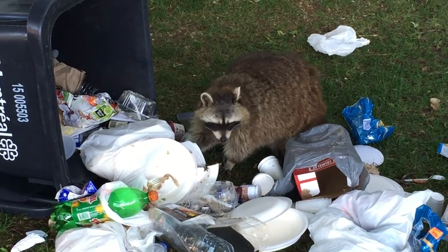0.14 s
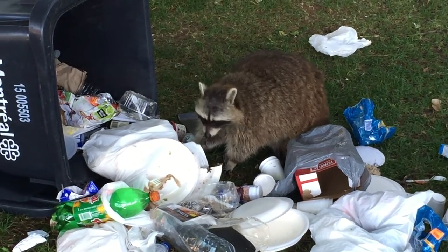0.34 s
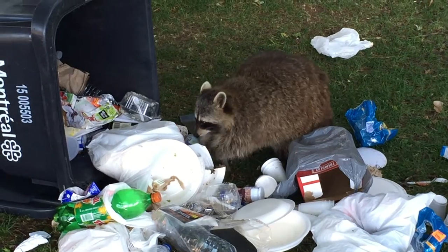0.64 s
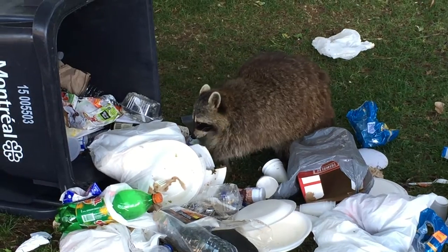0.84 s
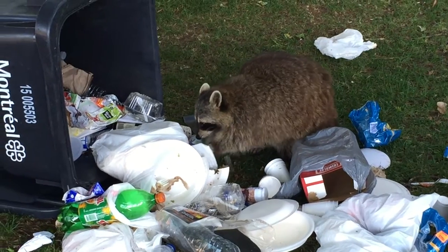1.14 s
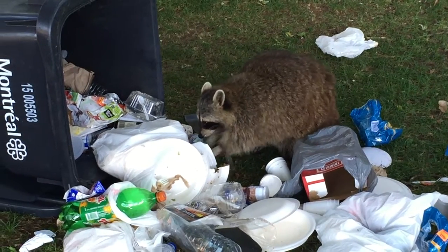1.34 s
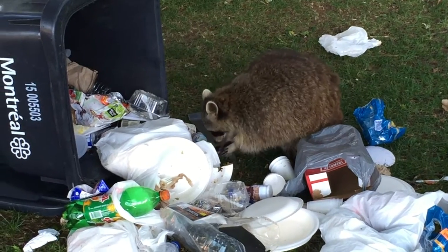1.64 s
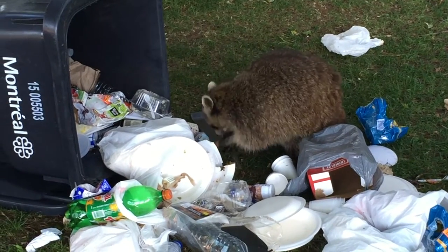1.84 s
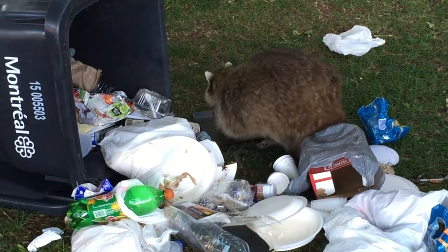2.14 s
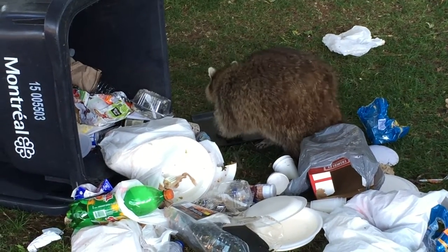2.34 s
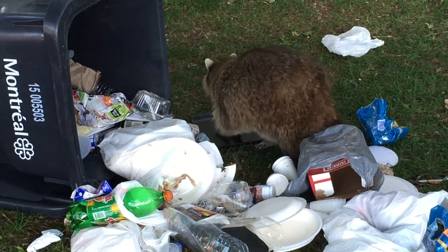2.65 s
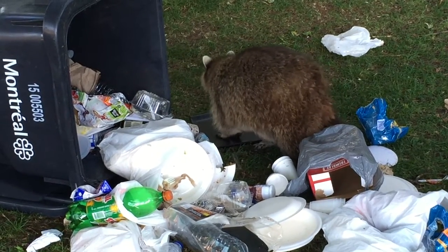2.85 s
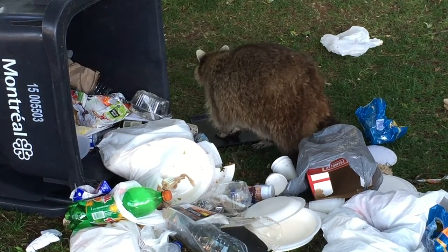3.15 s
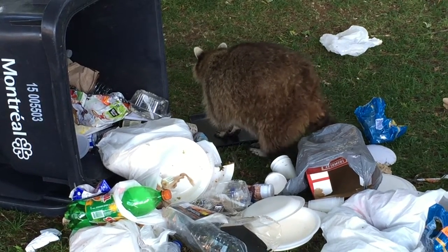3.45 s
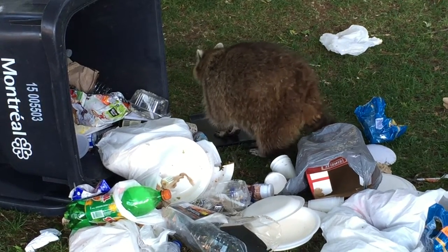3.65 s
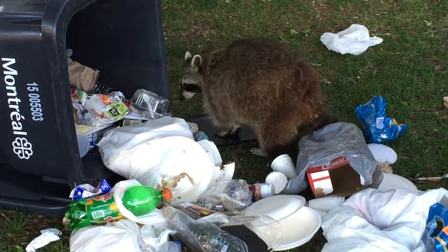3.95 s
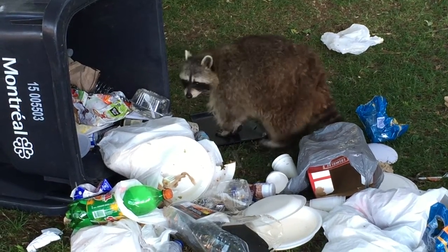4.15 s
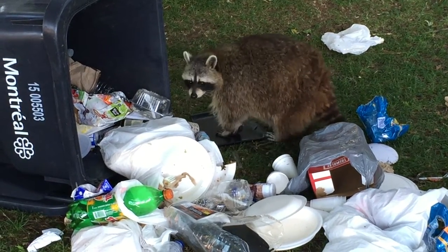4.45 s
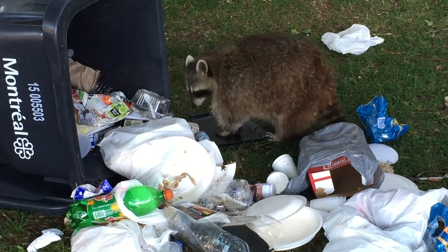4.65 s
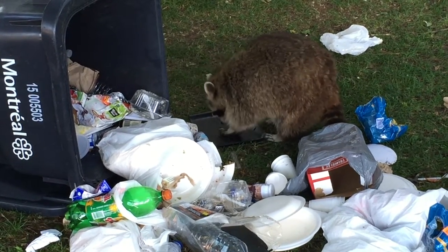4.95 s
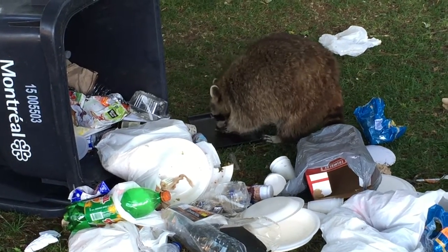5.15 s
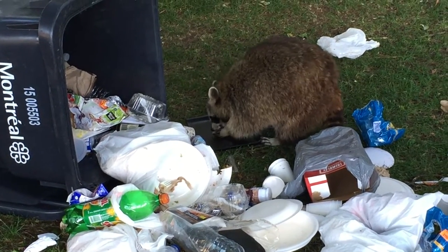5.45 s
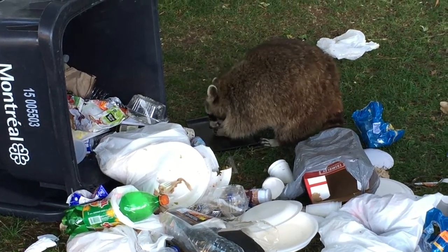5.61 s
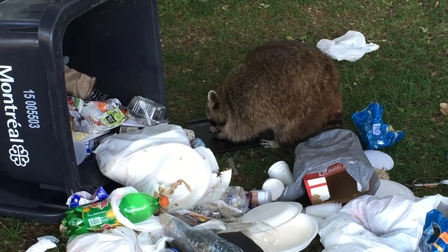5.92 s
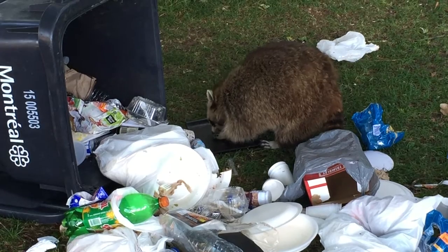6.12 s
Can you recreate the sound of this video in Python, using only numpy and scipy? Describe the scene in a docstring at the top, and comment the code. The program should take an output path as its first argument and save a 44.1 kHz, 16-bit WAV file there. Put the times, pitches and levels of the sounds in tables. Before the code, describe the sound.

Low, soft traffic rumble and airy hush lie under sparse litter sounds. Plastic film rubs dully, a cup ticks, and a hollow thin container knocks several times in rapid succession a third of the way in. After a pause, a bright short crinkle sounds, followed by a sharp bird chip and fading repeats, then distant whistles. Mono, open lawn, litter a little way off, with faint reflections.

```python
"""Raccoon in spilled rubbish

A raccoon noses through rubbish spilled from a bin onto a park lawn. Thin plastic containers knock and
tick as damped modes; bags crinkle and swish as coloured grains of friction. One small bird gives high
falling chips, another whistles further off and stray notes echo, all as gliding tones. Beneath lie
shaped noise for the town's low rumble, far tyres and air, and a faint mains hum from a wavering sine."""
import sys
import numpy as np
from scipy import signal
from scipy.fft import rfft, irfft, next_fast_len
from scipy.io import wavfile
from scipy.ndimage import uniform_filter1d

SR = 44100
rng = np.random.default_rng(int(sys.argv[2]) if len(sys.argv) > 2 else 0)


def dump_mix(stems):
    """Bounce the given channels to the path in sys.argv[1] as a 16-bit WAV at rate SR."""
    frames = np.atleast_2d(stems).T  # one column per channel
    limited = np.clip(frames, -1, 1)  # hard clip at full scale
    pcm = np.round(limited * 32767).astype(np.int16)
    wavfile.write(sys.argv[1], SR, pcm)


N = 276903


def undb(db):
    """Decibels to gain."""
    return 10 ** (np.asarray(db) / 20)


def unit(x):
    """Scale to rms 1."""
    return x / np.sqrt(np.mean(x ** 2))


def seconds(length):
    """Time axis of a short sound."""
    return np.arange(int(length * SR)) / SR


def add(out, start, x):
    """Mix x into out from the given time on."""
    i = max(int(start * SR), 0)
    out[i:i + len(x)] += x[:max(len(out) - i, 0)]


def flat_noise():
    """White noise at 0 dB per Hz."""
    return rng.standard_normal(N) * np.sqrt(SR / 2)


def colour(x, points, tilt_db=0):
    """Filter by an (f/Hz, level/dB) outline, tilted by some dB an octave from its first point."""
    hz, db = np.transpose(points)
    size = next_fast_len(len(x))
    octave = np.log2(np.maximum(np.fft.rfftfreq(size, 1 / SR), 1))
    tilted_db = db + tilt_db * np.log2(hz / hz[0])
    gain = undb(np.interp(octave, np.log2(hz), tilted_db))
    return irfft(rfft(x, size) * gain, size)[:len(x)]


def walk(rate):
    """Slow chance: random levels, rate per second, joined smoothly and scaled to rms 1."""
    k = max(int(SR / rate), 1)
    steps = np.repeat(rng.standard_normal(N // k + 1), k)
    return unit(uniform_filter1d(steps, k)[:N])


def scatter(x, t60, delay):
    """Diffuse echoes that build up after a delay and die away, at the energy of the source."""
    t = seconds(1)
    decay = np.exp(-np.log(1000) * t / t60)
    build_up = 1 - np.exp(-(t / delay) ** 2)
    tail = rng.standard_normal(len(t)) * decay * build_up
    return signal.fftconvolve(x, tail / np.linalg.norm(tail))[:N]


def ring(hz, t60, t):
    """One mode: a sine that loses 60 dB in t60 seconds."""
    return np.sin(2 * np.pi * hz * t) * np.exp(-np.log(1000) * t / t60)


def road(count=8, low_hz=400, high_hz=2000, gust_db=0.5, patchy_db=3.5):
    """Tyre noise carried by the breeze: it swells as a whole, and each narrow band fades by itself."""
    # spectral shape of tyres on a far road: f/Hz, relative density/dB
    tyre_shape = [(250, -118), (470, -105), (620, -92.5), (850, -99.5), (1150, -107), (1900, -115),
                  (2800, -130)]
    size = next_fast_len(N)
    spectrum = rfft(colour(flat_noise(), tyre_shape), size)
    edges = np.geomspace(low_hz, high_hz, count)
    band = np.searchsorted(edges, np.fft.rfftfreq(size, 1 / SR))
    patches = np.zeros(N)
    for k in range(count + 1):
        strip = irfft(spectrum * (band == k), size)[:N]
        patches += strip * undb(patchy_db * walk(14))
    return patches * undb(gust_db * walk(13))


def town(sway_db=0.67, waver_db=3, drone_db=2.46, breeze_db=0.83):
    """Engine rumble whose upper drone swells by itself, far tyres, a wash of air and a wavering hum."""
    # distant traffic, before its drift: f/Hz, density/dB per Hz
    rumble_outline = [(22, -101), (34, -98), (47, -72), (58, -69), (100, -66.5), (135, -68), (160, -75.5),
                      (186, -75), (250, -82.5), (315, -90.5), (400, -99), (900, -130)]
    # wash of leaves and air, before its drift: f/Hz, density/dB per Hz
    air_outline = [(250, -108), (480, -101), (1000, -103.3), (1600, -106.6), (2400, -110.3), (4400, -114.3),
                   (4900, -118.5), (5500, -116.5), (7600, -120.5), (9000, -120.5), (10400, -128),
                   (11700, -124), (15500, -127.5)]
    # tyre noise comes and goes with the far cars: t/s, level/dB
    tyre_swell = [(0, -75), (2.1, -74), (2.7, -71), (3.2, -73), (4.3, -73), (5, -70), (6.28, -74.5)]
    leave_s, fade_db_per_s = 4.46, 1.8  # engines hold, then draw away
    hum_hz, hum_db = 119.2, -58.5  # centre pitch and centre level
    t = np.arange(N) / SR

    engines = colour(flat_noise(), rumble_outline)
    drone = colour(engines, [(150, -40), (220, 0)])
    fade_db = -fade_db_per_s * np.maximum(t - leave_s, 0)
    low_rumble = (engines - drone) * undb(fade_db + sway_db * walk(13))  # the drone does not draw away
    rumble = low_rumble + drone * undb(drone_db * walk(6))
    tyres = unit(road()) * undb(np.interp(t, *np.transpose(tyre_swell)))
    air = colour(flat_noise(), air_outline) * undb(breeze_db * walk(4.5))
    hum = np.sqrt(2) * np.sin(2 * np.pi * hum_hz * t + 0.29 * walk(3))
    return rumble + tyres + air + hum * undb(hum_db + waver_db * walk(2.12))


def rub(friction, centre, half, db, tilt_db, hollow, shoulder=3.1):
    """One swell of friction, coloured by the film and its sinking squeak: its start time and sound."""
    # colour of film rubbed over a hollow, at full hollowness and no tilt: f/Hz, level/dB
    film = [(600, -13), (1700, -1), (4200, 0), (6000, -1), (6900, -8), (7700, -3), (8400, 1), (9200, -2),
            (10400, -10), (11800, 2), (13200, -9), (14300, -2), (14950, 7), (15800, -5)]
    # the sharpest resonance sinks as the film slackens: sag is the share of pitch lost per half length
    squeak_hz, squeak_width_hz, squeak_sag = 8300, 330, .035
    squeak_db = -6  # against the film, with full hollowness and no downward tilt

    start = max(centre - 3 * half, 0)
    grains = friction[int(start * SR):int((2 * centre - start) * SR)]
    u = (start + np.arange(len(grains)) / SR - centre) / half  # time from the centre in half lengths
    pressure = np.exp(-np.abs(u) ** shoulder / 2)
    outline = np.multiply(film, [1, hollow])  # film lying flat has shallower resonances
    rustle = unit(colour(grains, outline, tilt_db))

    # a moving resonance: shift down to 0 Hz, smooth with one pole, shift back up
    turn = np.exp(2j * np.pi * np.cumsum(squeak_hz * (1 - squeak_sag * u)) / SR)
    pole = np.exp(-np.pi * squeak_width_hz / SR)
    squeak = unit(np.real(turn * signal.lfilter([1], [1, -pole], grains / turn)))
    squeak *= undb(squeak_db + 2 * min(tilt_db, 0)) * hollow ** 2  # dull rubs hardly excite it
    return start, undb(db) * pressure * (rustle + squeak)


def bags(crease_rate=3500, crease_spread_db=2.0, hiss=0.88):
    """Sliding film lets go in tiny creases that swell with each rub and settle; some creases snap."""
    # rubs by paws, snout and tail: centre t/s, half length/s, film level/dB, tilt/dB per octave,
    # hollowness (0-1)
    rubs = [(.33, 0.058, -71.5, -8.5, 0.4), (0.53, 0.1, -75, -6, 0.65), (0.682, 0.032, -73, -5.5, 0.6),
            (1.234, 0.0058, -62, -10, 0.5), (1.94, 0.015, -75, -4, .3), (2.232, 0.0079, -66, -11, 0.4),
            (2.269, 0.032, -61, -6.5, 0.34), (2.475, .024, -78.5, -3, 0.4), (2.74, .11, -84, -12, 0.2),
            (3.89, 0.028, -75, -2, 0.7), (3.9368, 0.011, -57.5, 1.5, 0.87), (3.958, .008, -66.5, -3.5, 0.5),
            (6.215, 0.014, -85, 3, 1)]
    # single creases that snap through: centre t/s, film level/dB, tilt/dB per octave
    snaps = [(.455, -74, -1), (.538, -78, 2), (.690, -64, -1), (1.2422, -65, -3), (1.812, -79, 5),
             (2.2474, -55, -8), (2.253, -66, -1), (2.281, -71, -3), (2.453, -76, 5), (2.529, -66, 6)]
    snap_half_s, snap_hollow = 0.0012, 0.26
    # after each rub the film settles: later and longer, in half lengths of the rub,
    settle_lag, settle_stretch = 2, 3.3
    # and weaker, duller and flatter
    settle_db, settle_tilt_db, settle_hollow = -16.5, -5.5, 0.72

    out = np.zeros(N)
    creases = (rng.random(N) < crease_rate / SR) * rng.standard_normal(N)
    creases = creases * undb(crease_spread_db * rng.standard_normal(N))
    friction = unit(creases) + hiss * rng.standard_normal(N)
    for centre, half, db, tilt_db, hollow in rubs:
        add(out, *rub(friction, centre, half, db, tilt_db, hollow))
        add(out, *rub(friction, centre + settle_lag * half, settle_stretch * half,
                      db + settle_db, tilt_db + settle_tilt_db, settle_hollow * hollow))
    for centre, db, tilt_db in snaps:
        add(out, *rub(friction, centre, snap_half_s, db, tilt_db, snap_hollow))
    return out


def ticks(press_s=0.0007):
    """A paw presses on a cup or lid, which sounds two short modes with a softened onset."""
    # small pieces of litter tapped: t/s, direct peak/dB, main mode f/Hz, t60/s, upper mode f/Hz,
    # upper mode level against the main/dB
    taps = [(0.2907, -50, 1300, 0.0099, 3330, -15), (1.2412, -55, 1700, 0.0081, 4700, -10),
            (1.2414, -50, 1100, 0.021, 3580, -10.5), (1.3572, -55, 2030, 0.014, 1730, -1),
            (2.5483, -54, 990, 0.024, 2420, -11)]
    out, t = np.zeros(N), seconds(.06)
    for start, peak_db, hz, t60, upper_hz, upper_db in taps:
        modes = ring(hz, t60, t) + undb(upper_db) * ring(upper_hz, t60, t)
        tick = modes * (1 - np.exp(-t / press_s))
        add(out, start, undb(peak_db) * tick / np.abs(tick).max())
    return out


def knocks():
    """Each contact pushes on the container for a moment and rings its damped modes."""
    # thin plastic container, broad flexing modes and a few that ring on, before the pitch factor and
    # the push: f/Hz, t60/s, relative level/dB
    container = [(345, 0.053, -17), (505, 0.07, -25), (690, 0.028, -13), (1054, 0.014, -4.5),
                 (1365, 0.23, -33), (1560, 0.0061, 6.5), (1492, 0.16, -32), (1860, 0.0082, 1.5),
                 (2130, 0.039, -14), (3130, 0.015, -4.5), (3970, 0.019, -2.5), (4600, 0.02, -6),
                 (6960, 0.0068, -3)]
    # the container tips over, edge after edge, and rocks back: t/s, direct peak/dB, contact time/ms,
    # pitch factor as it flexes
    contacts = [(2.2415, -34, .44, 1.02), (2.2468, -36.5, .17, 1.01), (2.2475, -40, .55, .78),
                (2.2492, -43, .2, .92), (2.2519, -34, .44, 1), (2.2553, -46, .3, 1.12),
                (2.2765, -46, .6, 1.06), (2.2802, -44.5, .24, 1.08), (2.2848, -50, .35, 1.15)]
    out, t = np.zeros(N), seconds(.2)
    hz, t60, db = np.transpose(container)[:, :, None]
    # some neighbouring modes swing against each other
    sign = np.array([1, 1, 1, -1, 1, 1, 1, -1, 1, -1, 1, -1, 1])[:, None]
    for start, peak_db, contact_ms, pitch in contacts:
        body = np.sum(sign * undb(db) * ring(hz * pitch, t60, t), axis=0)
        contact = contact_ms / 1000
        push = np.sin(np.pi * seconds(contact) / contact) ** 2
        blow = np.convolve(body, push)  # a longer push misses the high modes
        add(out, start, undb(peak_db) * blow / np.abs(blow).max())
    return out


def litter(heap_db=-10, yard_db=-17, wall_db=-22, wall_s=.088):
    """Ticks and knocks, thrown back by heap and bin, later by the trees and, duller, by a far wall."""
    hits = ticks() + knocks()
    heap = scatter(hits, t60=.1, delay=.012)
    yard = scatter(hits, t60=.42, delay=.04)
    wall = scatter(hits, t60=.05, delay=.002)
    wall = colour(wall, [(900, -8), (1500, 0), (2100, 0), (3200, -12)])
    out = hits + undb(heap_db) * heap + undb(yard_db) * yard
    add(out, wall_s, undb(wall_db) * wall)
    return out


def twitter(count=26, low_hz=2650, high_hz=4300, level_db=-82, spread_db=4):
    """Stray notes from all over the park: t/s, length/s, start f/Hz, end f/Hz, level/dB."""
    when, pitch, fall, loud = rng.random((count, 4)).T
    start = when * (N / SR - .2)
    length = 0.016 + 0.033 * fall  # longer notes fall further
    hz = low_hz * (high_hz / low_hz) ** pitch
    return zip(start, length, hz, hz * (1 - .1 * fall), level_db + spread_db * (loud - .5))


def bird(notes, partials_db, crest, quiver):
    """Short notes: pitch slides in a gentle S-curve with a quiver while the voice swells and fades."""
    out, wobble = np.zeros(N), 1 + quiver * walk(400)
    for start, length, from_hz, to_hz, db in notes:
        u = seconds(length) / length
        slide = u - np.sin(2 * np.pi * u) / (6 * np.pi)
        hz = (from_hz + (to_hz - from_hz) * slide) * wobble[int(start * SR):][:len(u)]
        phase = 2 * np.pi * np.cumsum(hz) / SR
        voice = sum(undb(level) * np.sin(k * phase) for k, level in enumerate(partials_db, 1))
        swell = np.sin(np.pi * u ** crest) ** 0.67  # a crest below 1 peaks early
        add(out, start, undb(db) * unit(voice) * swell)
    return out


def birds(near_echo_db=-7, far_echo_db=-5, stray_db=0, twig_db=-13):
    """Chips blur in twigs and echo in trees; the far bird smears more; stray notes are echoes only."""
    # both tables: t/s, length/s, start f/Hz, end f/Hz, rms level before the swell/dB
    # pitches are of the fundamental, before the quiver
    chips = [(1.2875, 0.028, 4620, 3990, -63), (4.2495, 0.038, 4460, 3690, -57.5),
             (4.35, 0.027, 4270, 3720, -68), (4.515, 0.032, 4100, 3620, -72.5),
             (4.603, 0.024, 4230, 3600, -77.5), (4.686, 0.026, 4230, 3500, -79),
             (4.766, 0.024, 4260, 3560, -73.5), (4.852, 0.018, 4220, 3700, -83)]  # nearer bird
    whistles = [(3.64, 0.038, 3060, 2780, -76), (3.7, 0.0404, 3880, 3460, -73),
                (5.17, .045, 2860, 2870, -79), (5.24, .035, 3020, 3000, -79),
                (5.315, 0.034, 2870, 2650, -77), (5.393, 0.032, 3800, 3400, -77),
                (5.423, .027, 3100, 2750, -66.5), (5.445, .065, 3480, 3600, -81)]  # far bird: some level, some falling, a few rising
    stray = bird(twitter(), partials_db=[0], crest=0.83, quiver=0.04)
    near = bird(chips, partials_db=[-6.5, 0, -25], crest=0.75, quiver=0.008)  # strongest on the second
    far = bird(whistles, partials_db=[0], crest=1.0, quiver=0.026)
    trees = undb(near_echo_db) * scatter(near, t60=.47, delay=.014)
    twigs = undb(twig_db) * scatter(near, t60=.06, delay=.003)
    far_echo = scatter(undb(far_echo_db) * far + undb(stray_db) * stray, t60=.42, delay=.045)
    return near + far + trees + twigs + far_echo


def scene():
    """Everything on the lawn, in one channel."""
    return (town() + bags() + litter() + birds())[None]


def record(dry, top_hz=15750):
    """The recorder cuts off the top with a steep low-pass."""
    low_pass = signal.ellip(10, .1, 70, top_hz, fs=SR, output="sos")
    return signal.sosfilt(low_pass, dry)


dry = scene()
out = record(dry)
dump_mix(out)
```